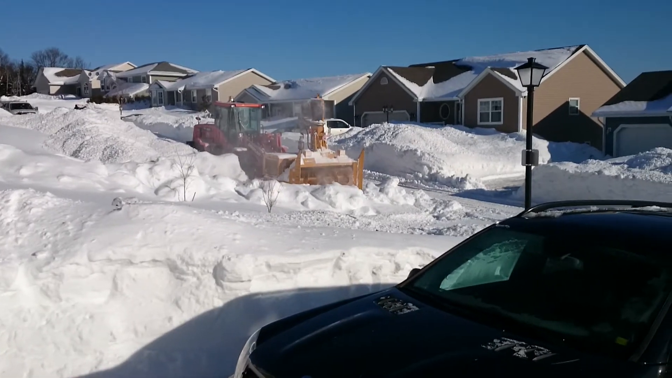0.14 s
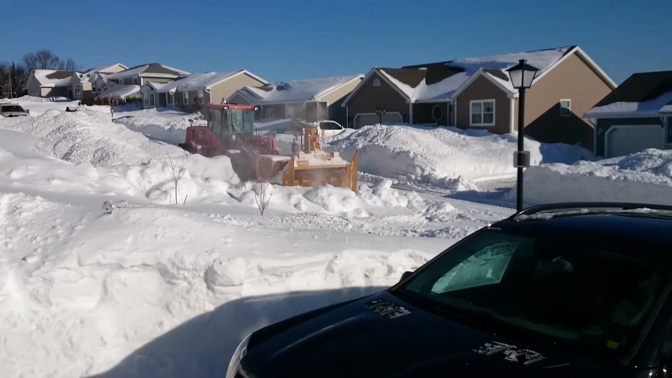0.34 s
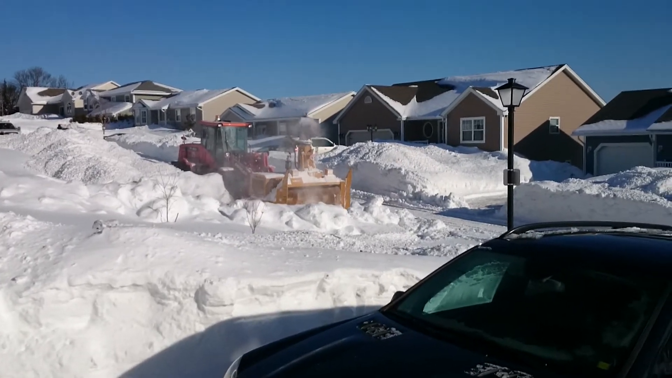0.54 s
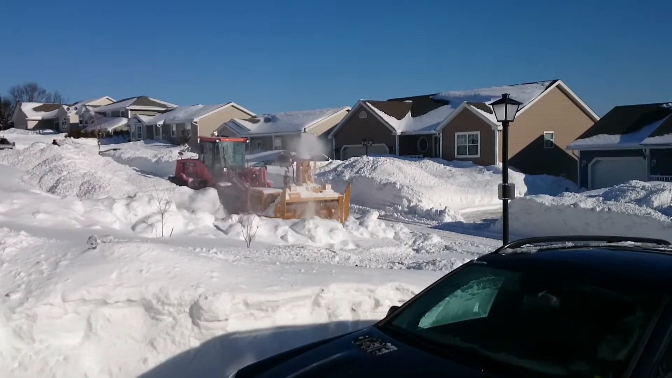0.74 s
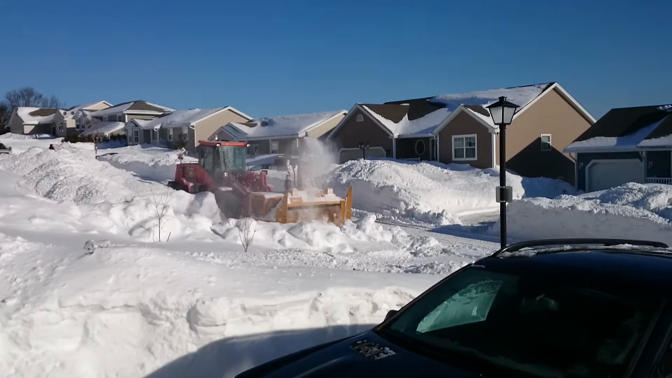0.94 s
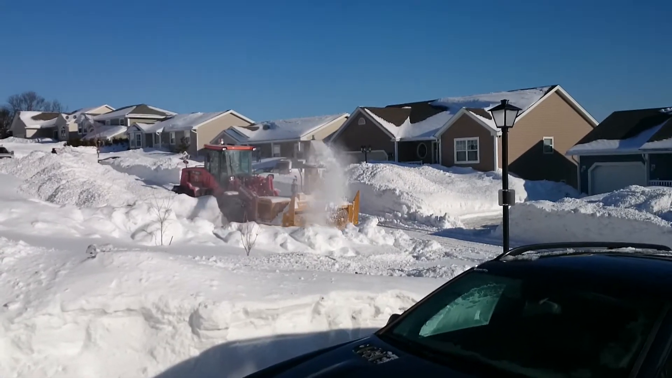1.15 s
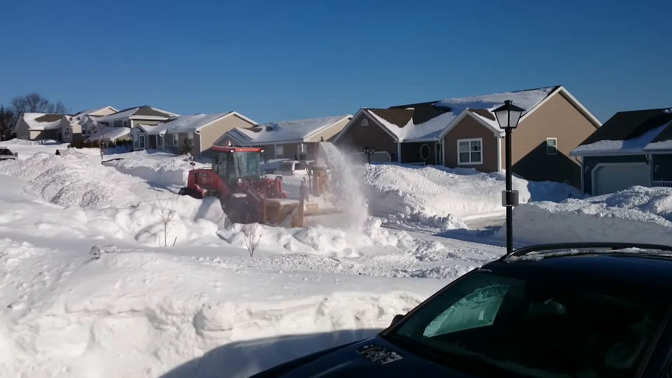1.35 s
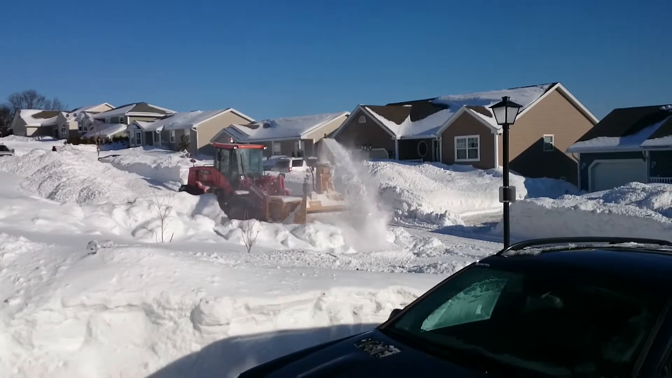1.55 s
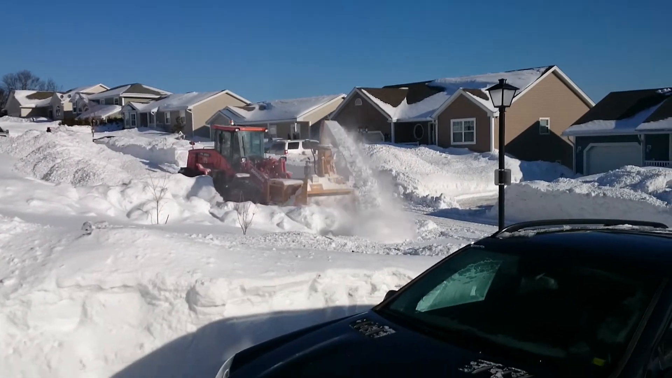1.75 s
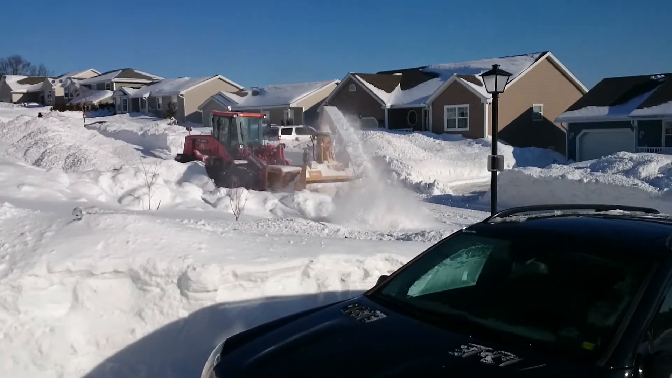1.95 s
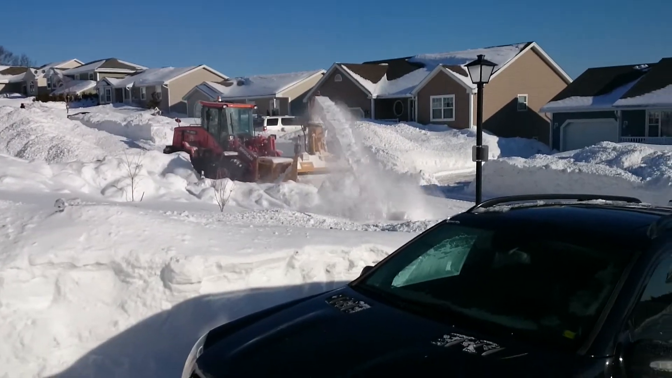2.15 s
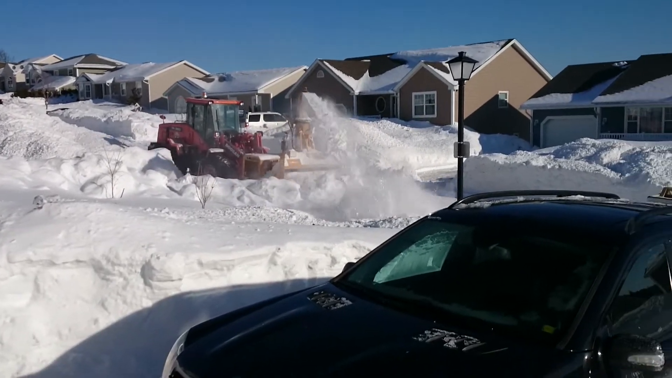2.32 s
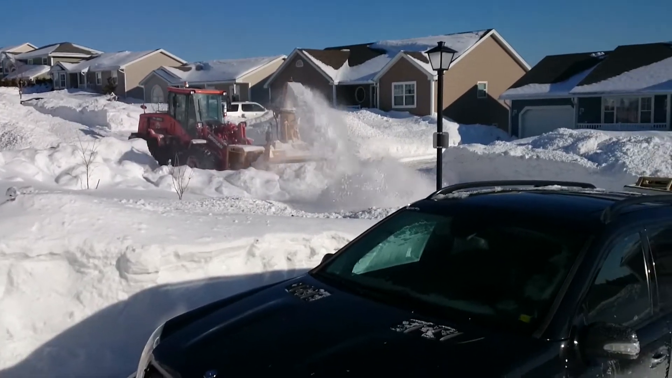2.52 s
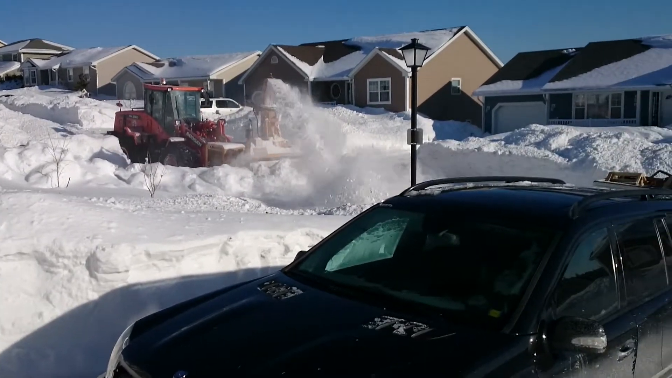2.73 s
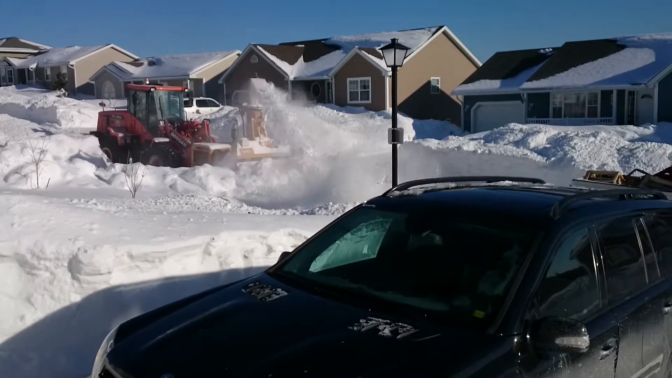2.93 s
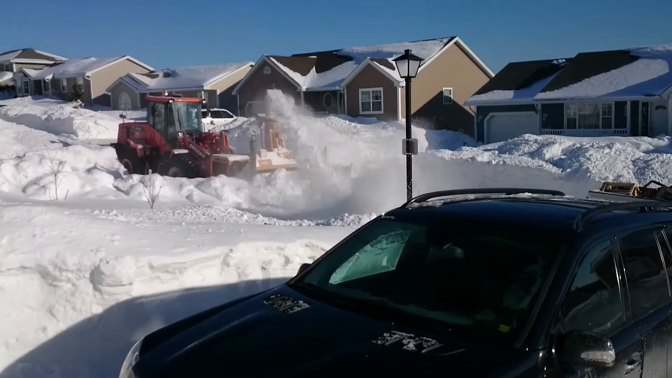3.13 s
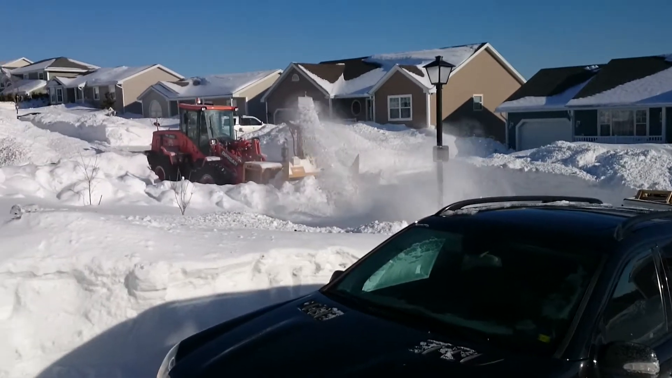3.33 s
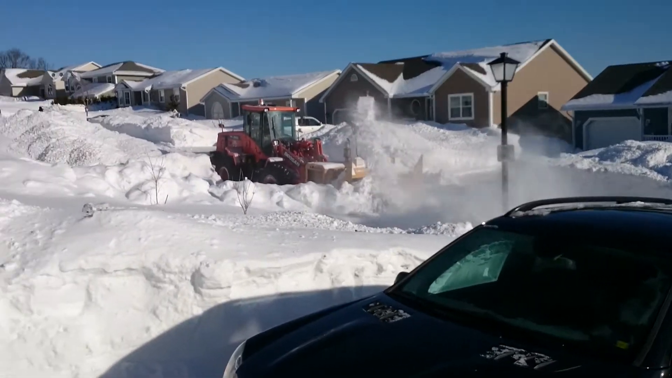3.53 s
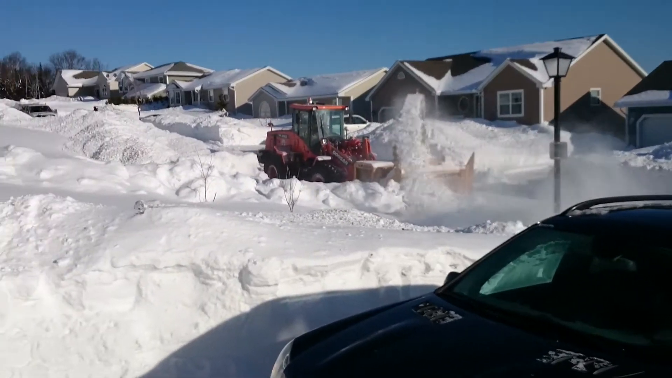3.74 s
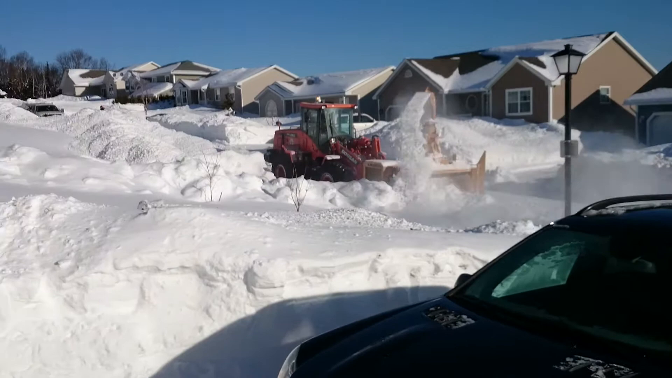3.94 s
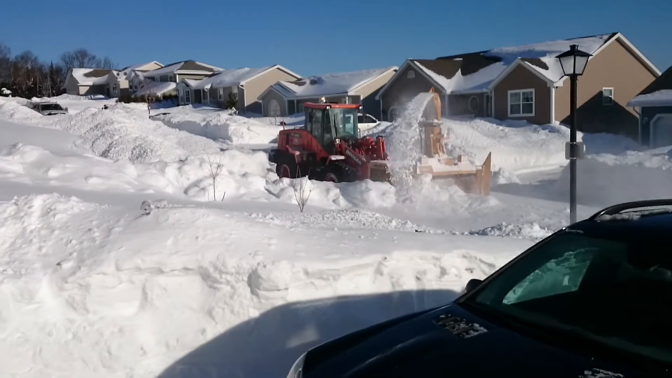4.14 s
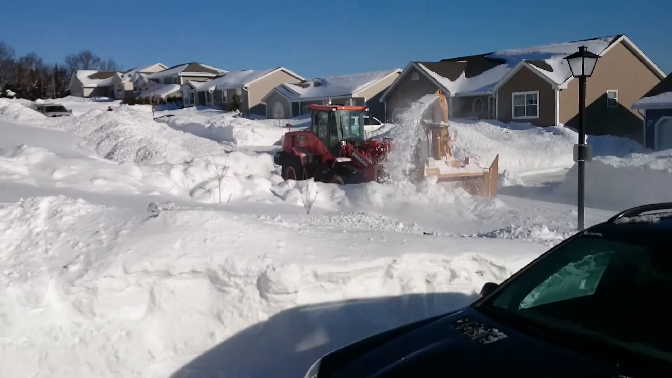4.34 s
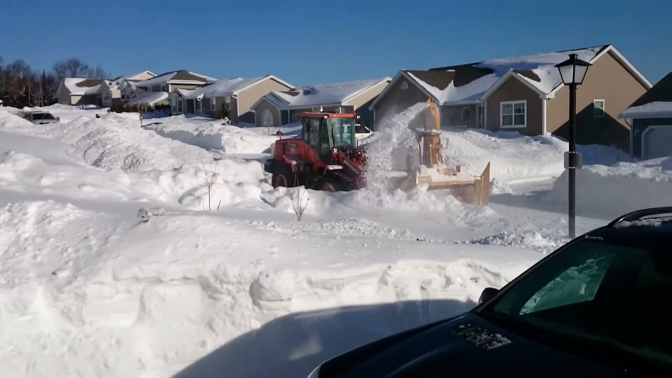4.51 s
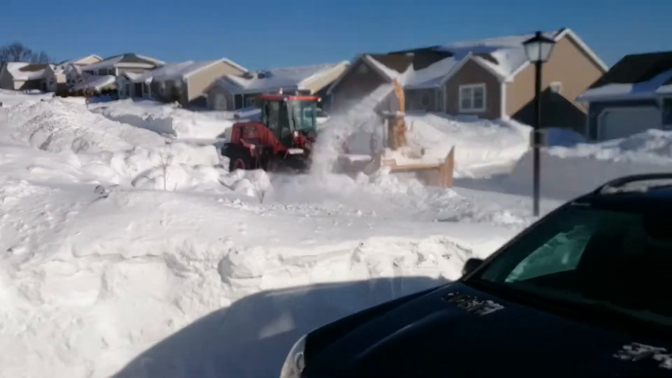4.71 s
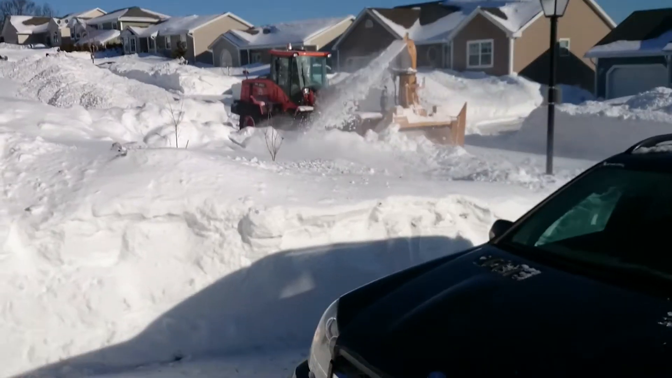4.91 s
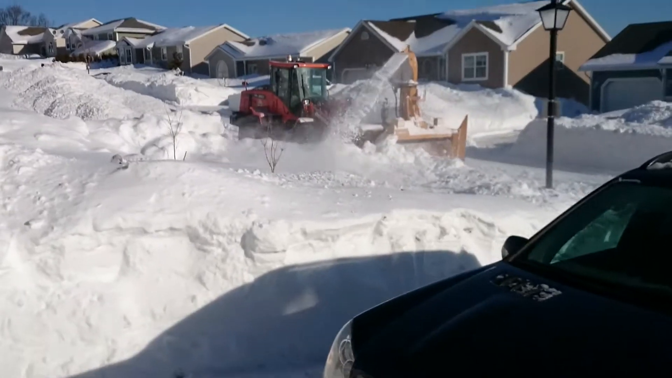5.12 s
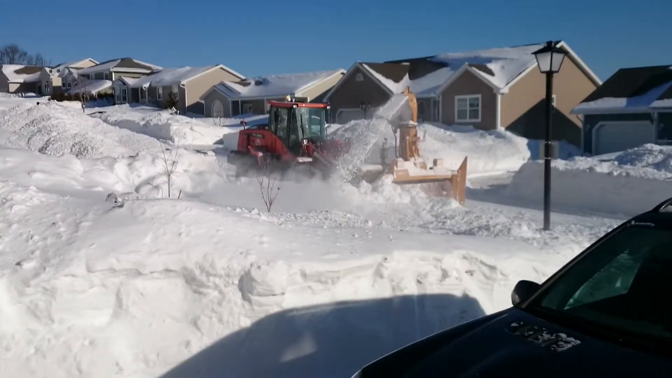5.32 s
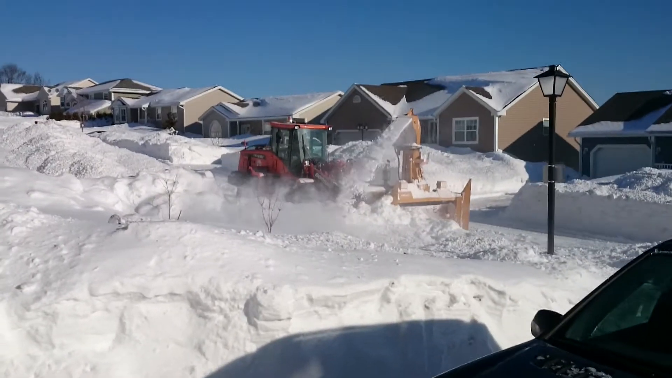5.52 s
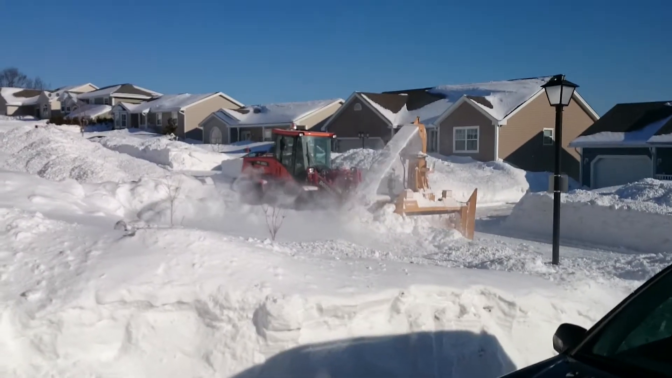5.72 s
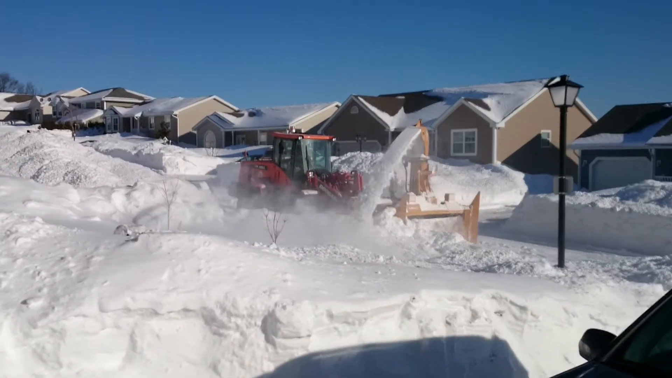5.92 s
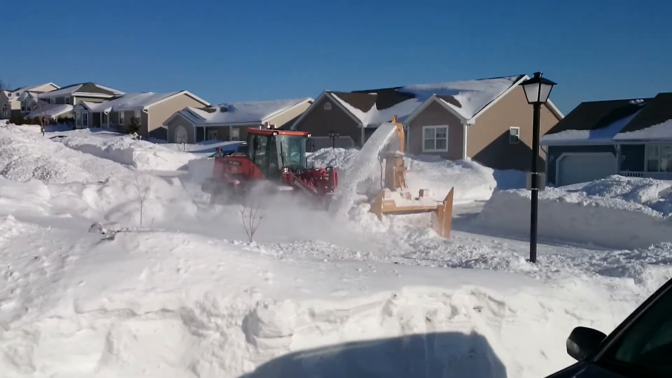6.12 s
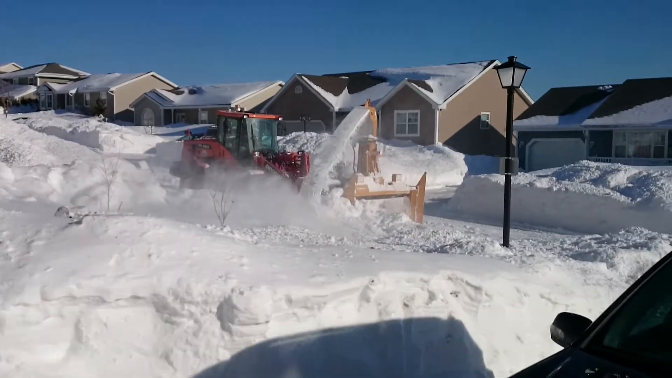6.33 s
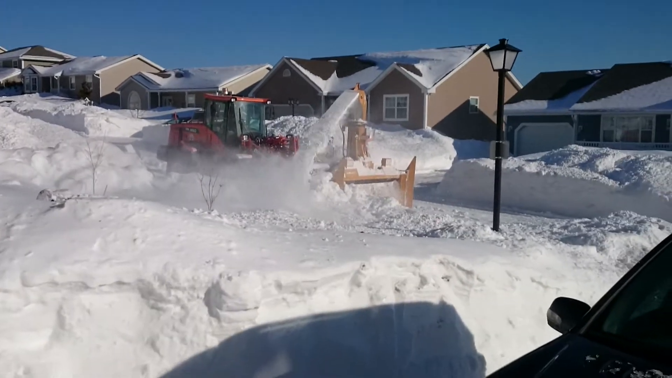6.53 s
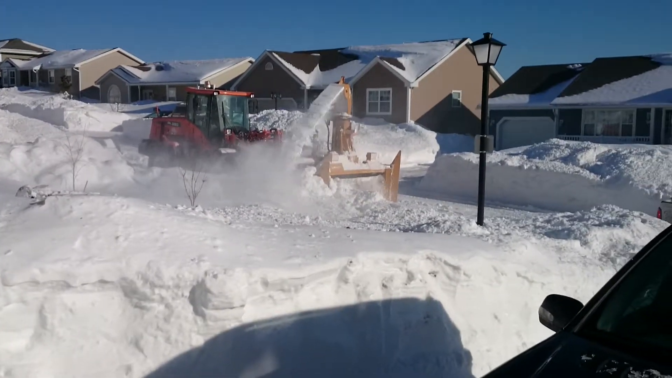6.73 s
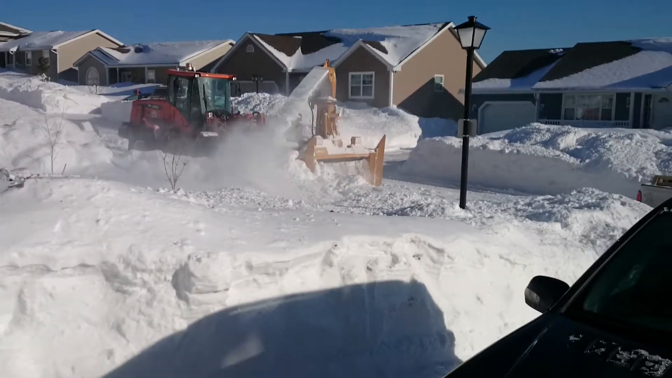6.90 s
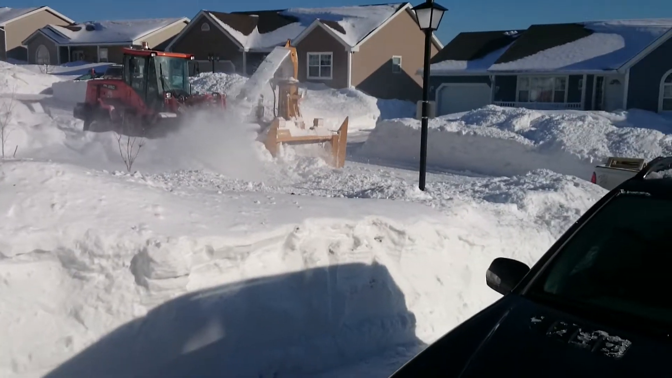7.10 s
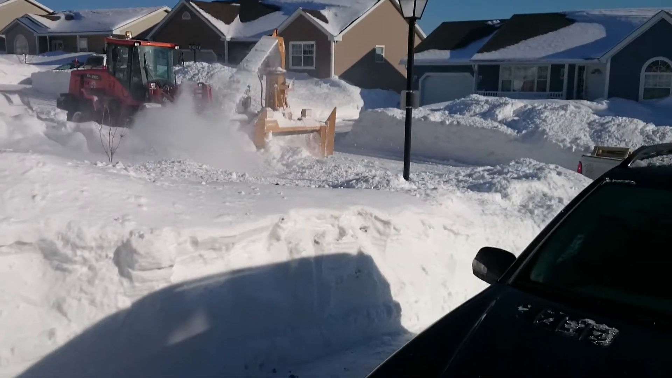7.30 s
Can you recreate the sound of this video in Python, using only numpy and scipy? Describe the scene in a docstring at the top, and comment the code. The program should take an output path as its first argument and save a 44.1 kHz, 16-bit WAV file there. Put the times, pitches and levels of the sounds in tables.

```python
"""Snowblower on a snowy street

A loader pushes an engine-driven snowblower, heard from across the yard. The blower's diesel sounds sines
at its firing rate, which also modulates the bright noise of exhaust and thrown snow. Impeller blades thump
below, pulses and a broad machinery roar fill in, and the loader's own engine hums. Delayed copies of the
hiss form a house echo and near echoes; a narrow-band whine and wind, strongest at the right port, join.
"""
import sys
import numpy as np
from scipy import signal
from scipy.fft import rfft, irfft, next_fast_len
from scipy.io import wavfile
from scipy.ndimage import map_coordinates

SR = 44100
rng = np.random.default_rng(int(sys.argv[2]) if len(sys.argv) > 2 else 0)


def wrap_up_sound(samples):
    """Save the sound to the file named by the first command line argument, as 16-bit audio."""
    columns = np.atleast_2d(samples).T
    # keep every value between -1 and 1, then stretch to whole-number steps
    tamed = np.clip(columns, -1, 1)
    steps = np.round(tamed * 32767).astype(np.int16)
    wavfile.write(sys.argv[1], SR, steps)


N = 324576
TIME_S = np.arange(N) / SR
SIZE = next_fast_len(N)
HZ = np.maximum(np.fft.rfftfreq(SIZE, 1 / SR), 1e-3)

# phase lead of the left port: (frequency [Hz], lead [rad])
LEFT_LEADS = [(40, 0.94), (105, 0.55), (300, 0.75), (700, 0.31), (1650, -0.68), (3000, 0.39)]
# level difference between the ports: (frequency [Hz], left minus right [dB])
LEANING = [(60, -3.5), (240, -0.5), (950, 1.5), (3770, -0.5), (15000, 11)]


def from_db(db):
    """Amplitude ratio is ten to the power of decibels over twenty."""
    return 10 ** (np.asarray(db) / 20)


def rms_one(x):
    """Normalise by the root mean square."""
    return x / np.sqrt(np.mean(x ** 2) + 1e-20)


def in_time(rows):
    """Linear interpolation of each column of a time table, one value per sample."""
    s, *columns = np.transpose(rows)
    return [np.interp(TIME_S, s, column) for column in columns]


def at_hz(points, hz):
    """Linear interpolation of a table along log frequency."""
    f, value = np.transpose(points)
    return np.interp(np.log(hz), np.log(np.maximum(f, 1)), value)


def drift(rate):
    """Low-passed noise of rms 1: two equal real poles at rate [Hz] make a slow random motion."""
    pole = np.exp(-80 * np.pi * rate / SR)   # computed at every 40th sample
    white = rng.standard_normal(N // 40 + 2002)
    slow = signal.lfilter([1], [1, -2 * pole, pole * pole], white)[2000:]   # settled part
    return np.interp(np.arange(N) / 40, np.arange(len(slow)), rms_one(slow))


def delayed(x, ms):
    """Propagation delay: read a signal late by a time that may change."""
    return map_coordinates(x, [np.arange(N) - ms * SR / 1000], order=3, mode="nearest")


def tone(hz, db, waver_db, rate=1.95):
    """A sine with random level modulation, and phase and level differences between ports; also its phase."""
    turn = 2 * np.pi * (np.cumsum(hz) / SR + rng.random())
    centre = np.mean(hz)
    sines = np.sin(turn - at_hz(LEFT_LEADS, centre) * np.array([[0], [1]]))
    lean_db = at_hz(LEANING, centre) / 2
    level_db = db + waver_db * drift(rate) + np.array([[lean_db], [-lean_db]])
    return np.sqrt(2) * from_db(level_db) * sines, turn


def port_noise(colour, left, right):
    """Partial coherence: the right port mixes the given spectrum with independent noise; both are coloured."""
    # coherence of the ports: (frequency [Hz], shared amplitude [0-1])
    likeness = [(60, 0.97), (250, 0.95), (700, 0.87), (1200, 0.03), (1700, 0.88), (2800, 0.28),
                (4500, 0.87), (7000, 0.88), (10000, 0), (15000, 0)]
    alike = np.clip(at_hz(likeness, HZ), 0, 1)
    diffuse = rfft(rng.standard_normal(N), SIZE)
    right = alike * right + np.sqrt(1 - alike ** 2) * diffuse
    return np.array([left, right]) * from_db(at_hz(colour, HZ))


def flicker(together, rate):
    """Random modulation with a part common to all bands and independent fast and slow parts."""
    return .3 * together + drift(rate) + .35 * drift(1)


def moving_noise(spectra, parts_hz, parts_db, centres_hz, patchy_db, rate, slide=np.zeros_like):
    """Time-varying filtering: overlapping bands follow the nearest level curves, each with its own flicker."""
    step = np.log(centres_hz[1] / centres_hz[0])
    inner = np.log(np.clip(HZ, centres_hz[0], centres_hz[-1]))
    edges = np.sqrt(np.multiply(parts_hz[1:], parts_hz[:-1]))
    power = np.abs(spectra.mean(axis=0)) ** 2
    part_power = np.bincount(np.digitize(HZ, edges), power) * 2 / SIZE ** 2
    base_db = 10 * np.log10(part_power)
    out, together = 0, drift(rate)
    for hz in centres_hz:
        weight = np.clip(1 - np.abs(inner - np.log(hz)) / step, 0, 1)
        band = irfft(spectra * weight, SIZE)[:, :N]
        place = np.interp(np.log(hz), np.log(parts_hz), np.arange(len(parts_hz)))
        k = min(int(place), len(parts_hz) - 2)
        below_db = parts_db[k] - base_db[k]
        above_db = parts_db[k + 1] - base_db[k + 1]
        level_db = (k + 1 - place) * below_db + (place - k) * above_db
        out = out + band * from_db(level_db + slide(hz) + patchy_db * flicker(together, rate))
    return out


def blower():
    """Periodic firing and blade passing give tones and pulses, and modulate the noise of hiss and roar."""
    # blower diesel: (time [s], firing rate [Hz], firing tone level [dB])
    diesel = [(0.0, 109.6, -39), (0.04, 110.0, -37), (0.72, 109.2, -36), (1.13, 102.7, -29.5),
              (1.93, 103.0, -28), (2.4, 108.5, -26), (3.18, 108.4, -30), (4.0, 111.2, -24.5),
              (4.82, 111.0, -25), (5.62, 103.3, -16.5), (6.19, 101.5, -14), (6.48, 104.7, -12.5),
              (6.91, 107.0, -15.5), (7.36, 106.9, -13)]
    # firing overtones: (multiple of firing rate [ratio], level [dB])
    overtones = [(.5, -40.5), (1.5, -38), (2.0, -36.5), (4.5, -48)]
    # impeller blades passing: (time [s], level [dB])
    impeller = [(0.0, -28), (0.82, -37), (1.88, -21.5), (2.75, -40), (3.5, -29), (4.61, -48), (5.23, -33),
                (7.3, -33), (7.36, -49)]
    # blade overtones: (multiple of blade rate [ratio], level [dB])
    blade_orders = [(3, -42), (6, -42.5), (7, -44.5)]
    gearing = .37   # blade passes for each firing

    firing_hz, firing_db = in_time(diesel)
    blade_hz = gearing * firing_hz
    drone, firing_turn = tone(firing_hz, firing_db, waver_db=.5, rate=29.0)
    drone += sum(tone(k * firing_hz, db, waver_db=2.5)[0] for k, db in overtones)
    thump, blade_turn = tone(blade_hz, *in_time(impeller), waver_db=-1.0)
    drone += thump + blade_chug(blade_turn)
    drone += sum(tone(k * blade_hz, db, waver_db=3.0)[0] for k, db in blade_orders)
    throbbing_roar = roar() * (1 + 0.12 * np.cos(blade_turn))
    hiss = chopped_hiss(firing_turn, firing_db)
    return drone + throbbing_roar + near_echoes(hiss + house_echo(hiss))


def chopped_hiss(firing_turn, firing_db):
    """Amplitude modulation: exhaust and snow noise swells with each firing, more as the engine works harder."""
    # hiss: (time [s], low range level [dB], middle range level [dB], treble range level [dB])
    ranges = [(0.0,-33,-26.5,-35), (0.18,-34.5,-33,-38), (.8,-26.5,-24,-30.5), (1.29,-19.5,-19,-27),
              (1.82,-17,-16.5,-25), (2.6,-19,-18.5,-26.5), (3.0,-21,-20.5,-28), (3.55,-20,-18.5,-34),
              (3.85,-21,-25.5,-31), (4.08,-20.5,-15.5,-34.5), (4.5,-30,-28.5,-40.5), (4.98,-18,-17,-27),
              (5.14,-22,-22,-31.5), (5.43,-19,-20,-27.5), (5.7,-19,-17.5,-22.5), (6.05,-23,-17,-35),
              (6.25,-23,-17,-27.5), (6.35,-28,-22.5,-32.5), (6.62,-27,-18.5,-27.5), (6.87,-30,-26.5,-33),
              (7.2,-29.5,-28,-34.5), (7.36,-28.5,-17,-28)]
    # drift of the end parts against their ranges: (time [s], lowest part [dB], top part [dB])
    ends = [(0, 5, 1), (1.3, 0, 2), (2.3, -2, -6.5), (3.3, -1.5, 1), (4.6, 0, 5), (5.2, -2, -1.5),
            (6.2, -3.5, 2), (7.36, 3, 0.5)]
    # parts of the hiss: (frequency [Hz], level against its range [dB], share of the chopping [ratio],
    # share of the lumps [ratio], share of the leaning [ratio])
    hiss_parts = [(3710, -4, 0.55, 0.5, 0.23), (4690, -2, 0.9, 1.6, 0.11), (6109, -0.5, 1.5, 0.16, 0.18),
                  (8940, 0.84, 1.7, 0.19, 0.83), (13850, -10, 0.86, .3, 1.0)]
    # treble leans left as the ports turn: (time [s], left minus right [dB])
    treble_lean = [(0.0, 12), (0.84, 22), (0.96, 16), (2.4, 11), (3.59, 14.5), (3.85, 25), (4.92, 9),
                   (7.36, 13)]
    chop_depth, chop_per_db, chop_at_db = .24, .013, -26   # depth at the reference level, and its slope

    depth = np.clip(chop_depth + chop_per_db * (firing_db - chop_at_db), 0, .9)
    puffs = 1 + depth * np.cos(firing_turn - 1.5 + 0.18 * drift(28.0))   # firings are not quite even
    puff_db = 20 * np.log10(puffs / np.sqrt(1 + depth ** 2 / 2))
    lump_db = lumps()
    low, middle, treble = in_time(ranges)
    lowest_db, top_db = in_time(ends)
    lean_db, = in_time(treble_lean)
    levels_db = (low + lowest_db, low, middle, treble, treble + top_db)
    parts_db = []
    for level_db, (_, rel_db, chop, burst, share) in zip(levels_db, hiss_parts):
        lean = np.array([share * lean_db, -share * lean_db]) / 2
        parts_db.append(level_db + rel_db + chop * puff_db + burst * lump_db + lean)
    parts_hz = [row[0] for row in hiss_parts]
    return moving_noise(hiss_paths(), parts_hz, parts_db, np.geomspace(2500, 14000, 20), patchy_db=1.63,
                        rate=17.0, slide=lambda hz: crest(hz) + surges(hz))


def hiss_paths():
    """Two-path propagation: white noise arrives direct and round a wall, the wall path late on the right."""
    # amount that comes round a wall on the left: (time [s], share of power [0-1])
    wall_share = [(0, 0.02), (2.1, 0.62), (3.5, 0.08), (3.9, 0.75), (4.45, 0.6), (4.7, 0.5), (7.36, 0)]
    # spectrum of the hiss before its levels are set: (frequency [Hz], density [dB per Hz])
    colour = [(1300, -36), (2200, -32), (2600, -18.5), (3780, -5), (4170, -5.5), (4640, -2.5), (5330, -1.5),
              (6230, 2.5), (7770, -12.5), (8860, -17.5), (10700, -11.5), (11600, -25), (13000, -8.5),
              (14200, -21), (15700, -27)]
    # treble of the right port against the left: (frequency [Hz], level [dB])
    right_port = [(10700, 3.5), (11600, -3), (13000, 8), (15400, 10.5)]
    wall_lag_ms, port_lag_ms, port_lag_sway_ms = 0.475, 0.032, 0.046   # right port after left

    share = np.clip(in_time(wall_share)[0], 0, 1)
    direct_gain, wall_gain = np.sqrt(1 - share), np.sqrt(share)
    direct, wall = rng.standard_normal((2, N))
    left = direct_gain * direct + wall_gain * wall
    lag_ms = port_lag_ms + port_lag_sway_ms * drift(0.67)
    right = direct_gain * delayed(direct, lag_ms) + wall_gain * delayed(wall, wall_lag_ms)
    spectra = port_noise(colour, *rfft([left, right], SIZE))
    return spectra * from_db([0 * HZ, at_hz(right_port, HZ)])


def lumps():
    """Impulse and exponential decay: each lump of snow in the chute shifts the hiss level [dB] at once."""
    # lumps of snow burst in the chute: (time [s], level change [dB])
    bursts = [(4.64, 7), (4.966, 6.5), (6.135, -1.5)]
    decay_s = 0.04
    clicks = np.zeros(N)
    for s, change_db in bursts:
        clicks[round(s * SR)] = change_db
    return signal.lfilter([1], [1, -np.exp(-1 / (decay_s * SR))], clicks)


def crest(hz):
    """A moving spectral peak: change [dB] of a band as the crest slides from rest while the ports turn."""
    # strongest band of the hiss: (time [s], frequency [Hz])
    crest_track = [(0.0, 6250), (4.69, 6170), (5.41, 6870), (7.36, 6460)]
    rest_hz, height_db, width = 6250, 9.8, 0.18   # width in natural log of frequency
    centre_hz = in_time(crest_track)[0]
    moved, resting = [np.exp(-(np.log(hz / at) / width) ** 2) for at in (centre_hz, rest_hz)]
    return height_db * (moved - resting)


def surges(hz):
    """Gaussian bumps in time and log frequency briefly change a band's level [dB]."""
    # brief swells or dips of the hiss: (time [s], level change [dB], centre frequency [Hz])
    surge_rows = [(1.19, 5, 13100), (2.15, -2.5, 6200), (3.58, 5, 6100), (5.12, 5.5, 3780), (5.33, 8, 6500),
                  (6.2, 4, 5900), (6.45, 4, 6400), (6.95, 6, 6500)]
    spread_s, spread_octaves = .06, 0.36
    s, change_db, centre_hz = np.transpose(surge_rows)
    t = np.arange(0, N + 64, 64) / SR
    in_pitch = np.exp(-(np.log2(hz / centre_hz) / spread_octaves) ** 2)
    swell = np.exp(-((t[:, None] - s) / spread_s) ** 2) @ (change_db * in_pitch)
    return np.interp(TIME_S, t, swell)


def house_echo(x):
    """Comb filtering: one duller reflection off a house front, later as the machine moves on."""
    # echo delay: (time [s], left [ms], right [ms])
    house_lag = [(0, 5.65, 6.0), (3.3, 6.75, 7.15), (4.2, 7.5, 7.9), (7.36, 9.5, 9.7)]
    # echo level before fading, a row each for left and right: (level [dB])
    house_db = [
        [-8],
        [-12],
    ]
    fade_from_s, fade_db_per_s = 4.5, 1
    dull = signal.sosfilt(signal.butter(2, 9000.0, fs=SR, output="sos"), x)
    fade_db = fade_db_per_s * np.maximum(TIME_S - fade_from_s, 0)
    return from_db(house_db - fade_db) * [delayed(side, ms) for side, ms in zip(dull, in_time(house_lag))]


def near_echoes(x):
    """Comb filtering by surfaces near the hand-held ports; echoes shift and vary as the hand moves."""
    # short echoes about which delay and level wander: (left delay [ms], right delay [ms], level [dB])
    echo_rows = [(0.798, 0.796, -20.5), (1.13, 1.294, -13), (1.92, 1.83, -11)]
    out = x.copy()
    dull = signal.sosfilt(signal.butter(2, 8000.0, fs=SR, output="sos"), x)
    for *ms, db in echo_rows:
        for side in (0, 1):
            gain = from_db(db + 3.3 * np.tanh(drift(1)))
            out[side] += gain * delayed(dull[side], ms[side] + 0.053 * drift(0.83))
    return out


def blade_chug(blade_turn):
    """A band-limited pulse train: a short uneven push at every blade pass, fading after its start."""
    # pass band of the pushes: (lower edge [Hz], upper edge [Hz])
    chug_band = [130, 800]
    start_db, filled_s, fade_db_per_s, sharpness = -34, .75, 25, 90   # fades from filled_s on
    pushes = np.exp(sharpness * (np.cos(blade_turn + 0.15 * drift(30.0)) - 1))
    pushes = pushes * from_db(1.9 * drift(27.0))
    pushes = signal.sosfilt(signal.butter(2, chug_band, "band", fs=SR, output="sos"), pushes)
    level_db = start_db - fade_db_per_s * np.maximum(TIME_S - filled_s, 0)
    return from_db(level_db) * rms_one(pushes)


def roar():
    """Broadband noise of augers, fans and engine blocks, with frequency-dependent differences at the ports."""
    # roar of machinery: (time [s], level of 360-1000 Hz [dB], upper part against that level [dB])
    roar_levels = [(0, -33, 0.5), (1.7, -31, 2.5), (3.2, -31, 1), (5.1, -33, -2), (5.7, -29, -5),
                   (7.36, -34, -1)]
    # centres of the lower and upper parts: (lower [Hz], upper [Hz])
    roar_parts = [700, 1600]
    # spectrum before its levels are set: (frequency [Hz], density [dB per Hz])
    colour = [(20, 8.5), (60, 0.5), (130, 2.5), (250, 4.5), (380, -3.5), (600, 1), (1000, -3.5), (1400, -8),
              (2000, -7), (2600, -11.5), (4000, -20)]
    bass_db = 3.5   # what the bass under 360 Hz adds to the level
    level_db, upper_db = in_time(roar_levels)
    white = rfft(rng.standard_normal(N), SIZE)
    lean_db = at_hz(LEANING, HZ) / 2
    lagging = white * np.exp(-1j * at_hz(LEFT_LEADS, HZ))
    spectra = port_noise(colour, white, lagging) * from_db([lean_db, -lean_db])
    return moving_noise(spectra, roar_parts, [level_db + bass_db, level_db + upper_db],
                        np.geomspace(60, 2500, 10), patchy_db=1.34, rate=10.0)


def loader():
    """Harmonic engine hum: a fundamental with a slightly wandering pitch, and its octave."""
    # loader's hum: (time [s], level [dB])
    hum_levels = [(0, -40), (1.09, -33), (1.45, -43.5), (2.85, -28.5), (3.11, -49), (3.3, -37), (3.96, -33),
                  (5.6, -34.5), (6.0, -39), (7.36, -45)]
    hz, db = 338.3 + 2.2 * drift(0.61), in_time(hum_levels)[0]
    hum = tone(hz, db, waver_db=1.5, rate=3.8)[0]
    octave = tone(2 * hz, db - 17.5, waver_db=6.0)[0]
    return hum + octave


def whine():
    """Quadrature modulation: slow noises on a carrier make a hoarse narrow band, sagging and wandering."""
    # hoarse whine: (time [s], level [dB])
    whine_levels = [(0, -46), (1.0, -43), (1.3, -34), (2.2, -31), (2.75, -41), (2.9, -33), (4.3, -43),
                    (7.2, -38), (7.36, -41)]
    start_hz, sag_hz_per_s = 1685, 9
    hz = start_hz - sag_hz_per_s * TIME_S + 24 * drift(3.3)
    turn = 2 * np.pi * np.cumsum(hz) / SR
    carrier = drift(39.0) * np.cos(turn) + drift(60.0) * np.sin(turn)
    return from_db(in_time(whine_levels)[0]) * carrier


def wind():
    """Low-frequency pressure fluctuation: band-passed noise, strong on the unshielded right port."""
    # wind before the port offsets: (time [s], level [dB])
    wind_levels = [(0.0, -22.5), (1.33, -34), (1.8, -40), (4.2, -25), (4.88, -18.5), (5.74, -23),
                   (6.33, -19), (7.36, -28)]
    # sheltered left and exposed right, a row each: (offset [dB])
    port_offsets = [
        [-24],
        [5],
    ]
    band = signal.butter(2, [2.5, 9.0], "band", fs=SR, output="sos")
    pressure = signal.sosfilt(band, rng.standard_normal(N + SR))[SR:]   # settled part
    return from_db(in_time(wind_levels)[0] + port_offsets) * rms_one(pressure)


def scene():
    """Superposition of all sources at the two ports."""
    return blower() + loader() + whine() + wind()


def record(dry):
    """Saturation rounds the peaks towards a ceiling of 0.85; a steep low-pass cuts the top."""
    rounded = dry / (1 + np.abs(dry / .85) ** 4) ** .25
    cutoff_hz = 15680
    return signal.sosfilt(signal.ellip(12, .3, 70, cutoff_hz, fs=SR, output="sos"), rounded)


dry = scene()
out = record(dry)
wrap_up_sound(out)
```